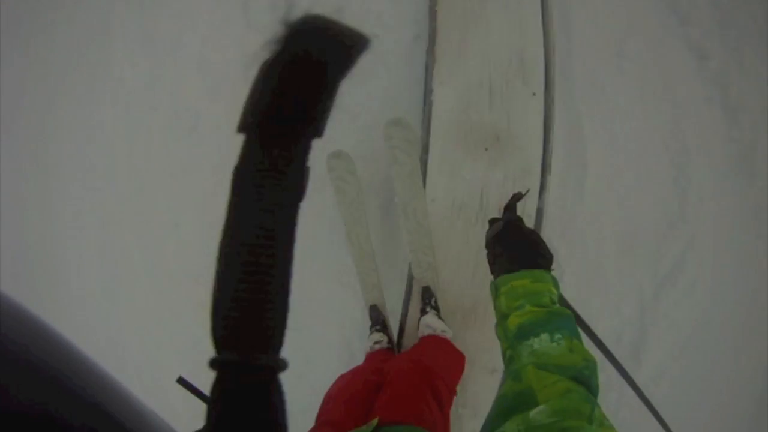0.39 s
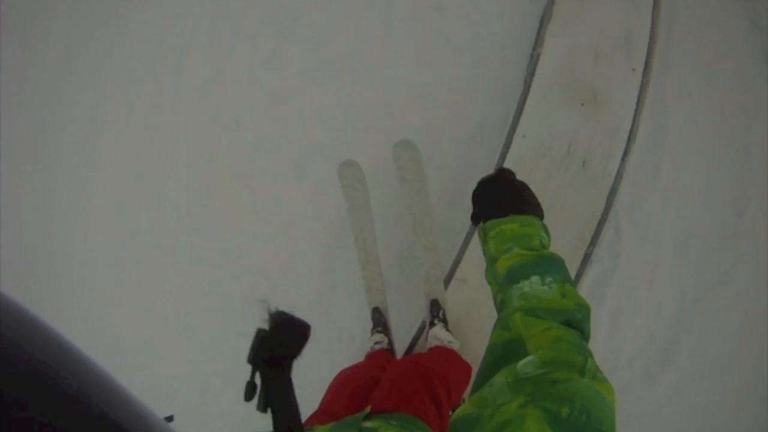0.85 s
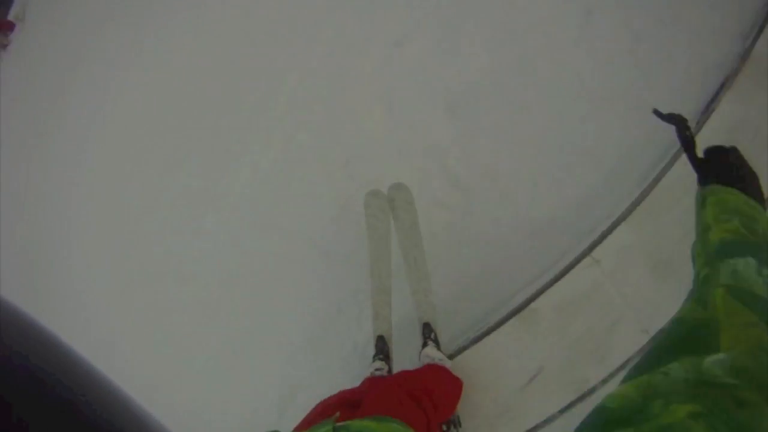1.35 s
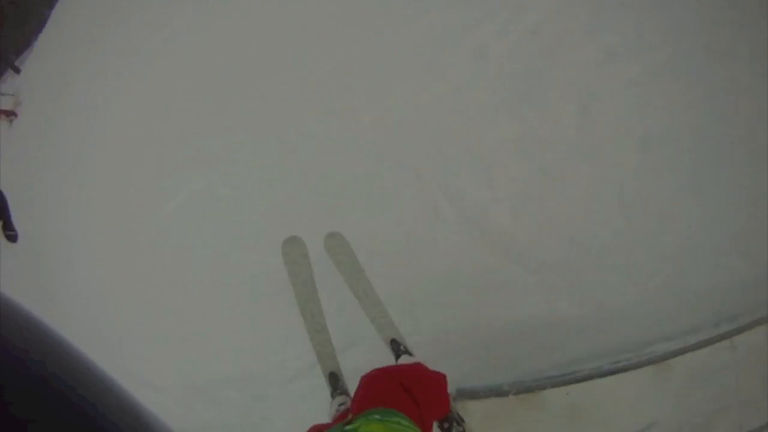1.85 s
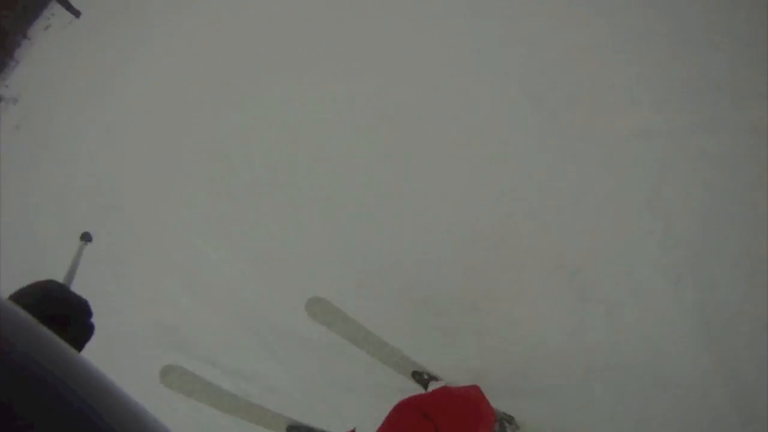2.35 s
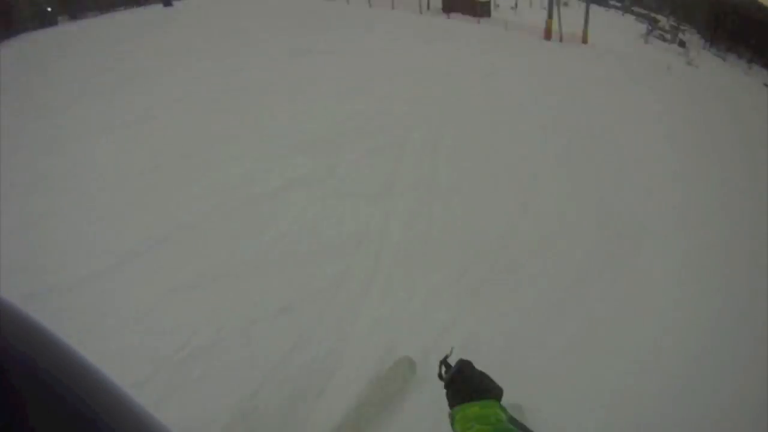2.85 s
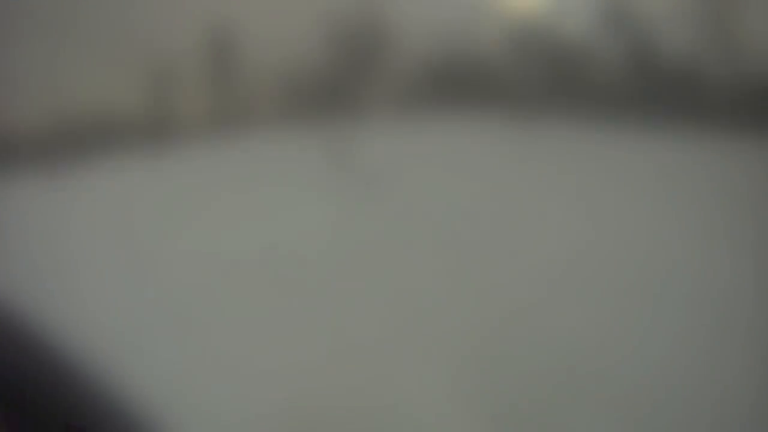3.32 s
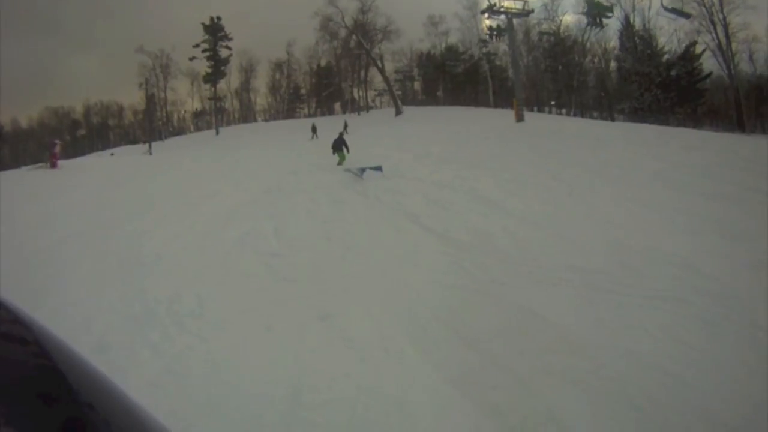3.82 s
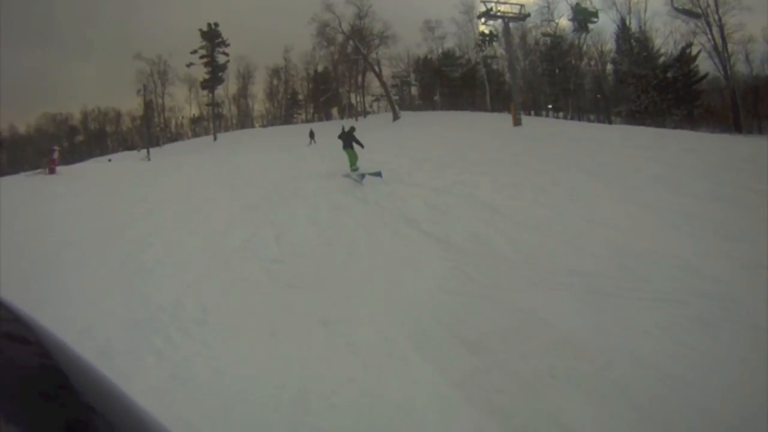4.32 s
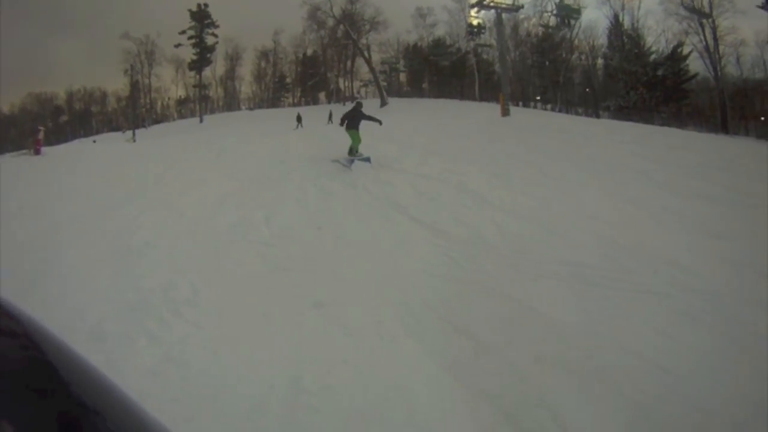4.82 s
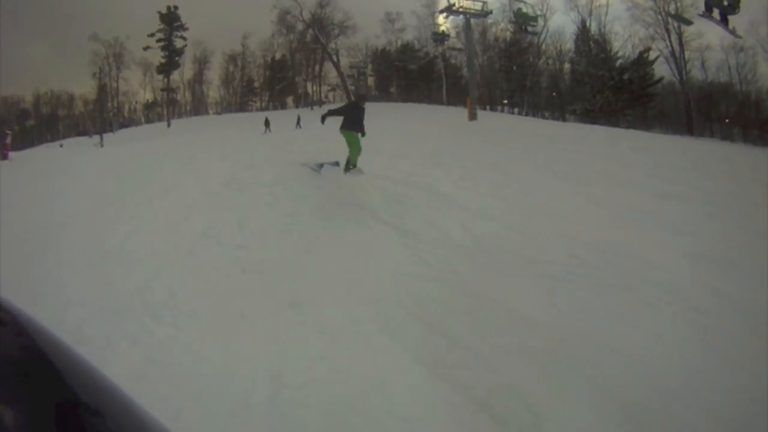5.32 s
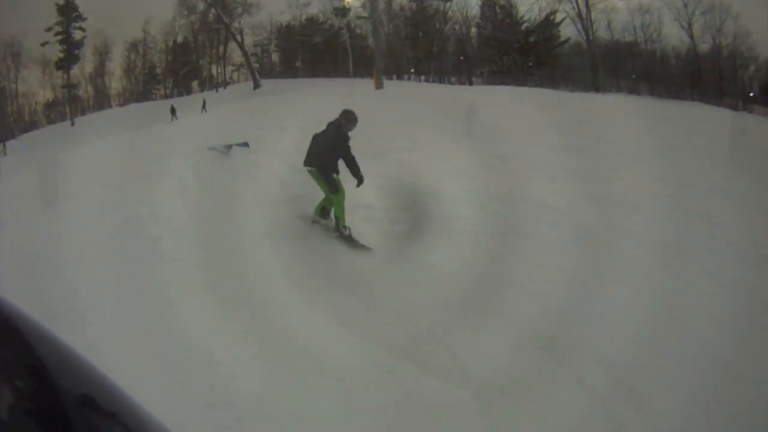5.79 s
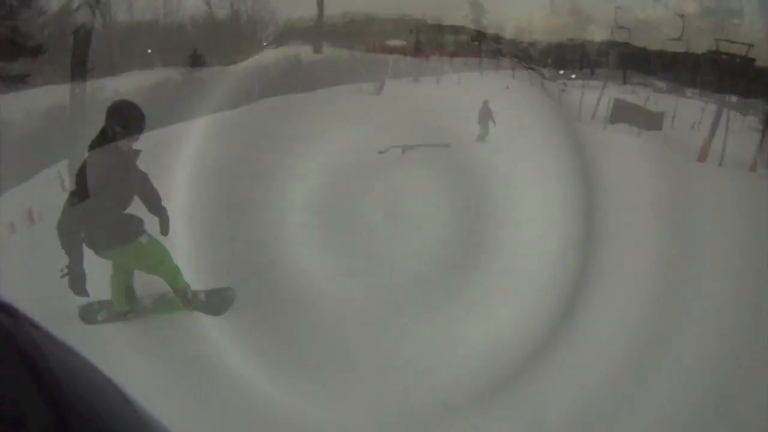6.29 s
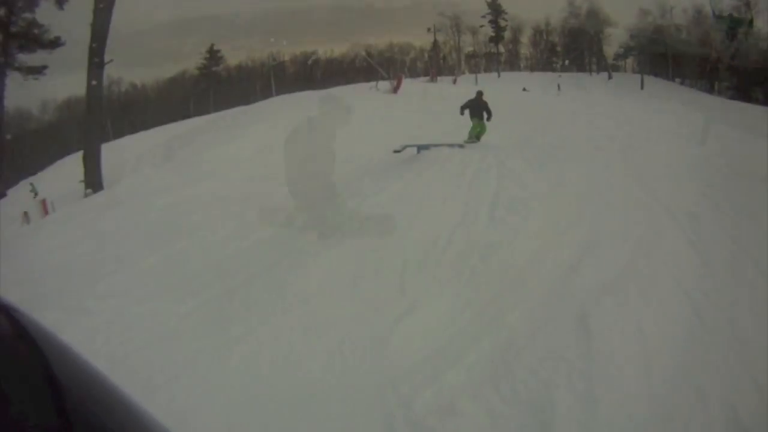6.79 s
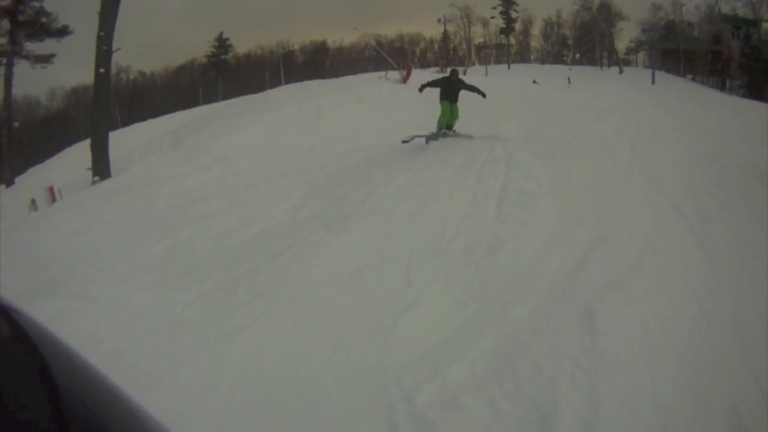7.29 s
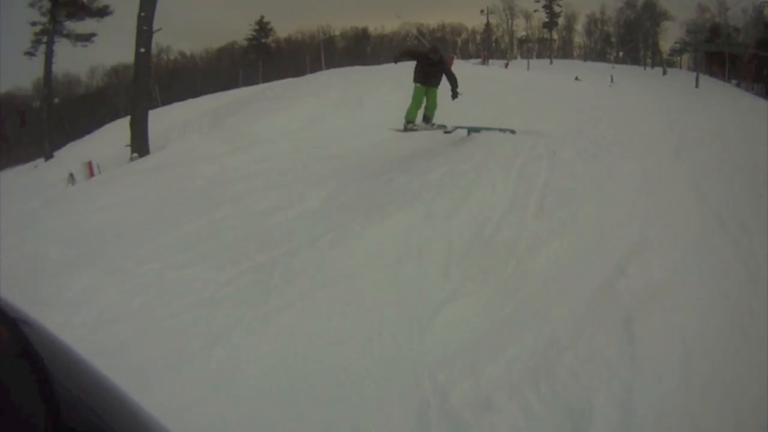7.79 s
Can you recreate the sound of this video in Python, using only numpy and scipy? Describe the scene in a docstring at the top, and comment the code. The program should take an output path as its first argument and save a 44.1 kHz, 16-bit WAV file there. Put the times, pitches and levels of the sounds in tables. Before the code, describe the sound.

Heard inside a sealed helmet-camera housing on a snowy slope: skis scrape in slow motion, dull and low, with heavy clunks and wind rumble. After a brief dip, sound jumps to full speed with sharp rattles, cracks and low thumps. Then it falls quiet, with faint hiss, small ticks and a snowboard's short spray and soft squeak passing by.

```python
"""Skis scrape over packed snow, heard in a helmet camera's sealed housing that rings with every grain.
Straps and poles knock the housing as strikes and rattles, low thumps follow as fading sines, wind rumbles.
The first part plays four times slower; later the skier stands still and a snowboard skids by: noise
bursts for the spray, a gliding sine for its singing edge. The camera samples at 12 kHz and holds each
sample, which mirrors every sound upward."""
import sys
import numpy as np
from scipy import signal
from scipy.fft import rfft, irfft
from scipy.io import wavfile
from scipy.ndimage import uniform_filter1d

SR = 44100
rng = np.random.default_rng(int(sys.argv[2]) if len(sys.argv) > 2 else 0)


def store_pcm(level_fs):
    """Save levels as 16-bit WAV."""
    pcm = np.round(np.clip(level_fs, -1, 1) * 32767).astype(np.int16)
    wavfile.write(sys.argv[1], SR, np.atleast_2d(pcm).T)


def attenuation_scalar(level_db):
    """Turn a level in dB into a linear amplitude multiplier (20 dB per decade)."""
    decades = np.asarray(level_db, float) / 20
    return 10 ** decades


N = 348390

CUT_S, SLOWER = 2.338, 4  # slow motion ends here (heard time); how many times slower it plays
CUT = round(CUT_S * SR)
TRUE_N = CUT // SLOWER + 1 + N - CUT  # samples on the slope's own clock

# ringing modes of the closed housing at true speed: pitch_hz [Hz], width_hz [Hz], level_db [dB, relative]
HOUSING = [(274, 220, -7.5), (807, 16, -0.5), (1244, 96, 2.5), (1387.5, 88, -4), (1565, 150, -1.5),
           (1877, 100, -0.5), (2099, 220, -0.5), (2255, 210, 0), (3084, 230, -4), (3580, 380, -8.5),
           (4300, 340, -13.5), (5110, 270, -9)]


def evened(x):
    """Scales to rms 1."""
    return x / np.sqrt(np.mean(x ** 2) + 1e-20)


def speed(s):
    """Playing speed at heard time s."""
    return np.where(np.asarray(s) < CUT_S, 1 / SLOWER, 1.)


def true_index(s):
    """Sample on the slope's own clock for heard time s."""
    return int(SR * (min(s, CUT_S) / SLOWER + max(s - CUT_S, 0)))


def control(rows, column):
    """A curve in heard time, read on the slope's own clock."""
    rows = np.array(rows)
    points = [true_index(s) for s in rows[:, 0]]
    return np.interp(np.arange(TRUE_N), points, rows[:, column])


def add(mix, s, sound):
    """Mixes a sound in at heard time s."""
    part = mix[true_index(s):][:len(sound)]
    part += sound[:len(part)]


def coloured(points):
    """Noise of rms 1 with the given spectrum."""
    spectrum_hz, spectrum_db = np.transpose(points)
    hz = np.fft.rfftfreq(TRUE_N, 1 / SR)
    gain = attenuation_scalar(np.interp(np.log(hz + 1), np.log(spectrum_hz), spectrum_db))
    return evened(irfft(rfft(rng.standard_normal(TRUE_N)) * gain, TRUE_N))


def drift(ms):
    """Slow chance of rms 1 that changes over about ms on the slope's own clock."""
    span = int(ms * SR / 2000)
    return evened(uniform_filter1d(uniform_filter1d(rng.standard_normal(TRUE_N), span), span))


def mode(hz, width, db):
    """The ring of one mode of the case after a tap: a sine that dies faster the wider the mode."""
    t = np.arange(3000) / SR
    return attenuation_scalar(db) * width * np.exp(-np.pi * width * t) * np.sin(2 * np.pi * hz * t)


def housing(x):
    """The closed case rings with its modes whatever shakes it."""
    ring = sum(mode(*row) for row in HOUSING)
    return signal.oaconvolve(x, ring)[:len(x)]


def hiss(level_db=-64.5):
    """Steady microphone noise with a fixed colour."""
    # noise colour: pitch_hz [Hz], density_db [dB per Hz, relative]
    hiss_colour = [(59, -36.5), (100, -7.5), (385, -11.5), (1150, -19), (1380, -16.5), (1610, -13),
                   (4120, -21.5), (5900, -34.5), (7670, -55), (13000, -120)]
    return attenuation_scalar(level_db) * coloured(hiss_colour)


def wind(breeze_db=-55, gust_db=-36, rise_s=0.021, fall_db_per_s=326):
    """Lumpy rumble that reaches higher as it grows; each buffet swells fast and falls away."""
    # steady air past the helmet: time_s [s, heard], level_db [dB]
    steady_air = [(0.0, -32.5), (0.64, -50), (1.25, -62.5), (1.4, -37), (2.2, -37.5), (2.4, -35.5),
                  (2.9, -41), (3.39, -50), (3.59, -59.5), (4.5, -53), (4.8, -57.5), (5.08, -52.5),
                  (5.94, -53), (7.9, -63.5)]
    # buffets when the head turns into the air: peak_s [s, heard], peak_db [dB, added as power]
    buffets = [(0.72, -37.5), (1.01, -32), (1.36, -32), (1.56, -28), (1.86, -24), (1.96, -26),
               (2.482, -26.5), (2.62, -28.5), (2.71, -24), (2.819, -25)]
    # rumble colours at true speed: pitch_hz [Hz], density_db [dB per Hz, relative]
    breeze_colour = [(10, -32), (25, -4), (42, -1.5), (58, -7.5), (85, -29), (400, -57), (1000, -56)]
    gust_colour = [(10, -11.5), (30, -8.5), (60, 2.5), (95, -4.5), (140, -20), (400, -38), (1000, -58.5)]
    power = attenuation_scalar(control(steady_air, column=1)) ** 2
    t = np.arange(TRUE_N) / SR
    for s, db in buffets:
        late = t - true_index(s) / SR
        swell = np.exp(-(np.minimum(late, 0) / rise_s) ** 2)
        fall = attenuation_scalar(db - fall_db_per_s * np.maximum(late, 0)) ** 2
        power = power + fall * swell
    level_db = 10 * np.log10(power)
    # the rumble crossfades from breeze to gust colour between the two levels
    strong = np.clip((level_db - breeze_db) / (gust_db - breeze_db), 0, 1)
    rumble = np.sqrt(1 - strong) * coloured(breeze_colour) + np.sqrt(strong) * coloured(gust_colour)
    lumps_db = 2 * drift(67)
    return attenuation_scalar(level_db) * evened(rumble * attenuation_scalar(lumps_db))


def low_thumps():
    """Low thumps after knocks: slow pressure swings, and the case's lowest mode near 250 Hz at true speed."""
    # thumps: start_s [s, heard], peak_db [dB], pitch_hz [Hz, as heard], fade_cycles [cycles]
    thumps = [(0.693, -37, 68, 9.9), (1.001, -32.5, 77, 2.2), (1.532, -29.5, 67, 3.3),
              (1.541, -15.5, 16.2, 0.71), (1.849, -29.5, 57, 3.1), (1.868, -15, 14, 0.85),
              (2.074, -20.5, 14.7, 1.1), (2.362, -25.5, 43.3, 4), (2.365, -34.5, 240, 3.7),
              (2.469, -27.5, 252, 2.2), (2.58, -22, 103, 0.16), (2.588, -29, 252, 2.8),
              (2.695, -25, 53, 0.6), (2.78, -10.5, 48.5, 0.27), (2.784, -20.5, 232, 2.1),
              (3.207, -30, 56, 0.28), (3.376, -34.5, 43, 0.29), (5.747, -46, 254, 1),
              (5.747, -41, 41, 0.42)]
    out, t = np.zeros(TRUE_N), np.arange(6000) / SR
    for s, db, hz, cycles in thumps:
        turns = hz / speed(s) * t
        envelope = np.exp(-turns / cycles) * (1 - np.exp(-6 * turns))
        swing = np.sin(2 * np.pi * turns) * envelope
        add(out, s, attenuation_scalar(db) * swing / swing.max())
    return out


def squeak():
    """The board edge sings: a near-pure tone that rises while the board skids."""
    # the singing edge: time_s [s], pitch_hz [Hz], level_db [dB]
    glide = [(6.09, 415, -68), (6.17, 413, -58.5), (6.25, 473, -57.5), (6.305, 515, -60)]
    s, hz, db = np.transpose(glide)
    t, out = np.arange(s[0], s[-1], 1 / SR), np.zeros(TRUE_N)
    phase = 2 * np.pi * np.cumsum(np.interp(t, s, hz)) / SR
    tone = np.sqrt(2) * np.sin(phase)
    fade = signal.windows.tukey(len(t), .15)
    add(out, s[0], attenuation_scalar(np.interp(t, s, db)) * tone * fade)
    return out


def skids(flutter_db=3, leak_db=-1, rise_s=0.037, fall_s=0.092):
    """Dense spray of snow in uneven bursts: noise through a wide resonance, then the housing."""
    # loose snow off an edge: start_s [s], length_s [s], level_db [dB], centre_hz [Hz], narrowness [Q]
    sprays = [(3.433, 0.2, -42, 2700, 1.8), (3.876, 0.34, -63, 2284, 9.5), (4.662, 0.26, -61, 2580, 1.6),
              (5.715, 0.11, -56, 3530, 1.9), (5.965, 0.4, -54.5, 2730, 1.34),
              (6.091, 0.2, -41.5, 3130, 2.84), (6.81, 0.075, -55.5, 2220, 0.9),
              (7.282, 0.34, -63, 2650, 1.6), (7.684, 0.095, -56, 2260, 1.35), (7.769, 0.13, -52, 1546, 1.1)]
    out = np.zeros(TRUE_N)
    for s, length, db, hz, narrowness in sprays:
        t = np.arange(0, length, 1 / SR)
        noise, flutter = rng.standard_normal((2, SR // 2))[:, :len(t)]
        # shift the noise down, smooth it with a double pole, shift it back up: a band around hz
        turn = np.exp(2j * np.pi * hz * t)
        pole = np.exp(-np.pi * hz / narrowness / SR)
        spray = (turn * signal.lfilter([1], np.poly([pole, pole]), noise / turn)).real
        # part shakes the case, a thinner part leaks in by air
        airborne = attenuation_scalar(leak_db) * evened(np.gradient(spray))
        spray = evened(housing(spray)) + airborne
        level_db = db + flutter_db * evened(uniform_filter1d(flutter, size=250))
        edges = np.clip(np.minimum(t / rise_s, (length - t) / fall_s), 0, 1)
        add(out, s, attenuation_scalar(level_db) * evened(spray) * edges)
    return out


def knocks(sharpness=1.127, focus=0.67, tail_db=-24, tail_ms=11, strike=10, crack_hz=4950,
           rise_ms=0.8, broad_db=-14):
    """Straps and poles set the housing ringing by a strike and a rattle; hard parts add a high crack."""
    # blows; long rattles are scuffs: start_s [s, heard], peak_db [dB, without crack],
    # centre_hz [Hz, as heard], rattle_ms [ms at true speed], crack_db [dB relative to the blow's peak]
    blows = [(0.135, -23, 544, 3.2, -63), (0.173, -22.5, 460, 4.3, -14), (0.19, -24, 400, 12.7, -53),
             (0.216, -26, 406, 11.6, -34.5), (0.242, -29, 504, 15, -40), (0.293, -28.5, 480, 3.1, -32),
             (0.336, -33, 301.8, 10, -41), (0.387, -12, 600, 3.75, -21), (0.675, -1, 517, 2.8, -52.5),
             (0.684, -5.5, 586, 2.4, -45.5), (0.714, -5, 445, 3.4, -36), (0.731, -12.5, 327, 6.1, -48.5),
             (0.951, -31, 466, 1.9, -22), (0.994, -11, 406, 2.95, -25.5), (1.016, -14, 311, 5.2, -49),
             (1.383, -32.5, 272.2, 3.9, -15), (1.466, -28, 415, 15, -47), (1.521, -14, 420, 3.4, -13),
             (1.534, -15.5, 300, 4, -28), (1.611, -29.5, 483, 1.2, -7.5), (1.698, -6.5, 430, 2.26, -11),
             (1.811, -30, 319, 13, -44), (1.846, -3, 410, 2.58, -17), (1.862, -17, 290, 3.9, -11.5),
             (1.932, -44.5, 1230, 4.9, 14.5), (2.051, -20.5, 484, 3.2, -37.5),
             (2.224, -25.5, 280, 2.2, -55.5), (2.262, -16.5, 320, 3.2, -24), (2.364, -11, 1750, 2.7, -24),
             (2.417, -31, 2650, 11, -12), (2.432, -31.5, 2155, 3.9, -7), (2.454, -32, 2200, 10, -22),
             (2.464, -14, 1270, 2, -16.5), (2.497, -19.5, 2000, 1.6, -15), (2.499, -28.5, 840, 8.6, -30),
             (2.527, -10, 1720, 2.6, -14.5), (2.545, -39, 1180, 35, -33), (2.561, -25.5, 1220, 6.5, -29),
             (2.59, -11, 1550, 2.9, -46), (2.623, -39, 1010, 5.1, -28), (2.673, -35, 1970, 20, -3.5),
             (2.688, -33, 1950, 11, 5), (2.704, -29, 1160, 6.8, -22), (2.763, -32, 1320, 17, -27),
             (2.778, -28.5, 1310, 4.7, -30), (2.784, -11.5, 1477, 1.3, -9), (2.79, -27.5, 1840, 7.9, 6),
             (2.804, -32.5, 1970, 11, 3.5), (2.828, -37.5, 2010, 6.8, 3), (2.899, -40, 1700, 8, 0),
             (3.01, -5, 2105, 3.8, -11), (3.072, -43.5, 2100, 3.5, -20), (3.104, -43, 1500, 40, -5.5),
             (3.17, -40, 2000, 12, -17), (3.2, -28, 2200, 3.3, -13), (3.208, -27.5, 2100, 15, -15),
             (3.226, -28, 2000, 2.3, -16), (3.232, -36, 1300, 12, -7), (3.314, -37, 2200, 23, -10),
             (3.341, -41, 1300, 25, -4), (3.364, -36, 2130, 22, -7), (4.252, -58, 1380, 18, 11.5),
             (4.368, -41.5, 2220, 7.9, 2), (4.654, -40.5, 1630, 6.5, -8), (4.777, -41, 1600, 8.4, -6.5),
             (4.838, -47, 2090, 11, -11.5), (5.136, -49, 1790, 22, -11), (5.739, -51.5, 1260, 48, -17.5),
             (5.926, -38.5, 2340, 8, 4), (6.513, -41, 820, 14, -26.5), (6.513, -37, 1500, 31, -36),
             (6.758, -30, 2260, 4.9, -12.5), (7.147, -35, 3150, 7.3, -9.5), (7.151, -41, 1520, 21.4, -30),
             (7.262, -39, 1720, 9.3, -14)]
    out, t = np.zeros(TRUE_N), np.arange(4000) / SR
    t_ms = 1000 * t
    thin = signal.butter(2, 800, "high", fs=SR)
    crack_band = signal.iirpeak(crack_hz, 5, SR)
    noises = rng.standard_normal((len(blows), len(t)))
    for (s, db, hz, ms, crack_db), noise in zip(blows, noises):
        rattle = noise * (np.exp(-(t_ms / ms) ** 2.6) + attenuation_scalar(tail_db) * np.exp(-t_ms / tail_ms))
        lumps_db = 2.2 * evened(uniform_filter1d(noise[::-1], 90))  # a rattle comes in lumps
        rattle = rattle * attenuation_scalar(lumps_db)
        rattle = rattle * np.minimum(t_ms / rise_ms, 1) ** 2  # the contact builds up
        # the shorter the contact, the harder its main impact
        rattle[int(rise_ms * SR / 1000)] += strike / ms
        # long contacts favour fewer modes
        colour = signal.iirpeak(hz / speed(s), sharpness * (ms / 4) ** focus, SR)
        focused = signal.lfilter(*colour, signal.lfilter(*colour, rattle))
        # every blow also wakes all the upper modes a little
        broad = attenuation_scalar(broad_db) * signal.lfilter(*thin, rattle)
        blow = housing(focused + broad)
        crack = signal.lfilter(*crack_band, rattle)
        blow = blow / abs(blow).max()
        crack = crack / abs(crack).max()
        add(out, s, attenuation_scalar(db) * (blow + attenuation_scalar(crack_db) * crack))
    return out


def scrape(grains_per_s=9000, spread_db=1.5, streak_db=2, streak_ms=13, treble_hz=2650):
    """Snow grains snap under the edges; each mode of the case swells alone, the high ones as edges bite."""
    # skis and board on snow, near then far: time_s [s, heard], level_db [dB], bite_db [dB, treble over rest]
    ride = [(0.0, -39, -6), (0.31, -39, -6), (0.6, -42, 0), (1.08, -53.5, -3), (1.34, -54, -3),
            (1.5, -40.5, -11), (1.72, -48.5, -7), (1.96, -43.5, -9.5), (2.2, -55.5, -6), (2.42, -50, -17),
            (2.64, -52.5, -11), (2.85, -51.5, -9), (3.43, -52, -9.5), (3.61, -69.5, -6), (5.04, -65.5, -3),
            (5.32, -69.5, -3.5), (6.0, -67, -3), (6.14, -59.5, -6), (6.9, -71.5, -6.5), (7.13, -60.5, -1.5),
            (7.9, -64, -3)]
    grains = (rng.random(TRUE_N) < grains_per_s / SR) * rng.choice([-1, 1], TRUE_N)
    grains = grains * attenuation_scalar(spread_db * np.minimum(rng.exponential(1, TRUE_N), 5))
    grains = grains * attenuation_scalar(1.2 * drift(6))  # short scratches close together
    low, high = np.zeros((2, TRUE_N))
    for k, row in enumerate(HOUSING):
        drive = (-1) ** k * grains * attenuation_scalar(streak_db * drift(streak_ms))
        band = high if row[0] > treble_hz else low
        band += signal.oaconvolve(drive, mode(*row))[:TRUE_N]
    bite = attenuation_scalar(control(ride, column=2))
    blend = (evened(low) + bite * evened(high)) / np.sqrt(1 + bite ** 2)
    return attenuation_scalar(control(ride, column=1)) * blend


def scene():
    """The slope on its own clock, then its start stretched to slow motion."""
    slope = hiss() + wind() + low_thumps() + squeak() + skids() + knocks() + scrape()
    first = TRUE_N - (N - CUT)
    slowed = signal.resample_poly(slope[:first], SLOWER, 1)[:CUT]
    return np.r_[slowed, slope[first:]][None]


def held(x, slower, edge_hz=15400):
    """Samples at 12 kHz of true time, repeats each sample four times, and cuts the top."""
    steps = np.repeat(signal.resample_poly(x, 40, 147 * slower), 4)
    # 48 kHz and edge_hz count in true time
    top_cut = signal.firwin(121, edge_hz, window=("kaiser", 8), fs=48000)
    steps = signal.oaconvolve(steps, top_cut, "same")
    return signal.resample_poly(steps, 147 * slower, 160)[:len(x)]


def band_limit(x):
    """A steep low-pass at the top of the band."""
    return signal.sosfilt(signal.butter(12, 16500, fs=SR, output="sos"), x)


def record(dry):
    """Sample and hold at each speed, a short fade across the cut, a bass roll-off and soft overload."""
    t = np.arange(N) / SR
    fade = np.clip(np.maximum((CUT_S - t) / 0.098, (t - CUT_S) / 0.02), 0, 1)  # out 98 ms, in 20 ms
    x = fade * np.r_[held(dry[0, :CUT], SLOWER), held(dry[0, CUT:], 1)]
    x = signal.sosfilt(signal.butter(1, 14, "high", fs=SR, output="sos"), x)
    x = 1.7 * np.tanh(x / 1.7)  # the loudest blows overload softly
    return band_limit(x[None])


dry = scene()
out = record(dry)
store_pcm(out)
```